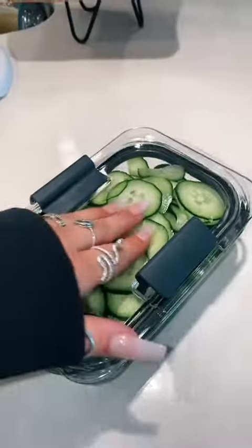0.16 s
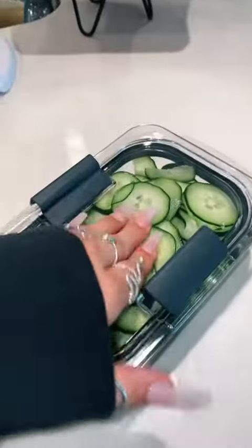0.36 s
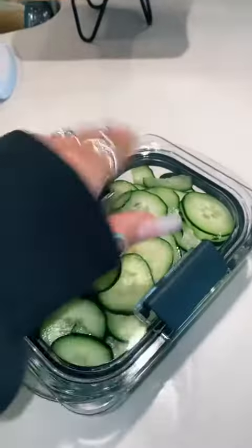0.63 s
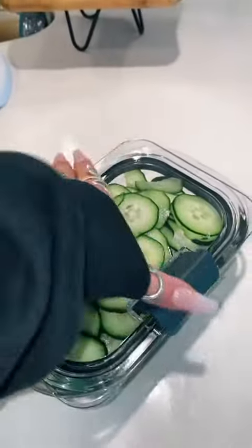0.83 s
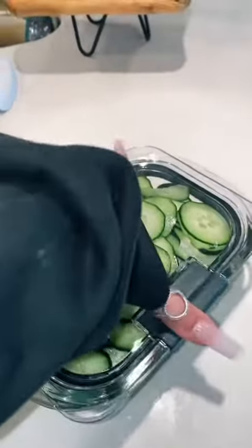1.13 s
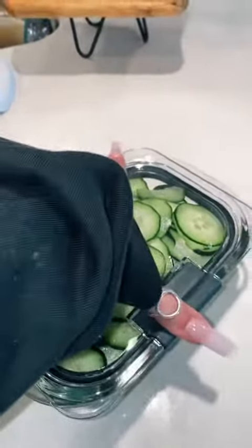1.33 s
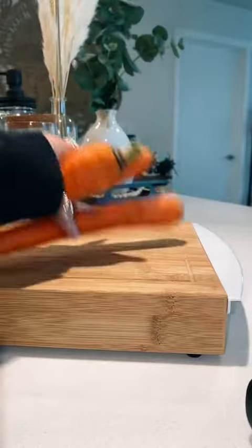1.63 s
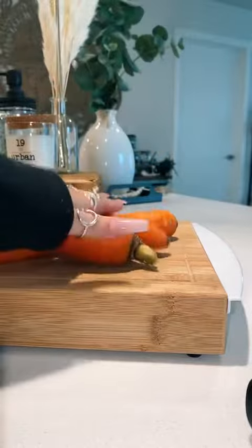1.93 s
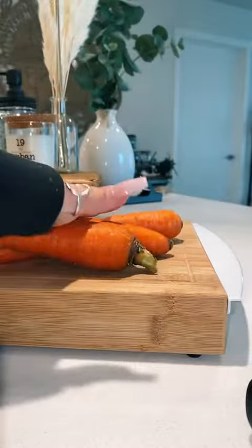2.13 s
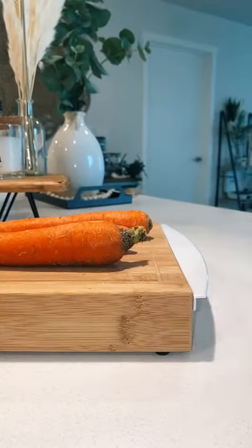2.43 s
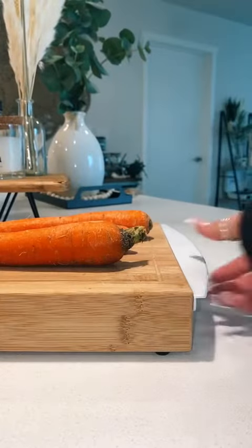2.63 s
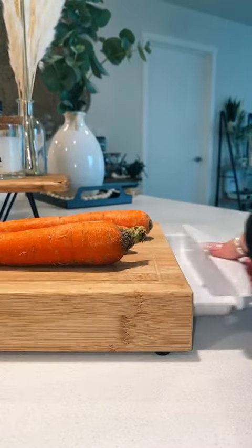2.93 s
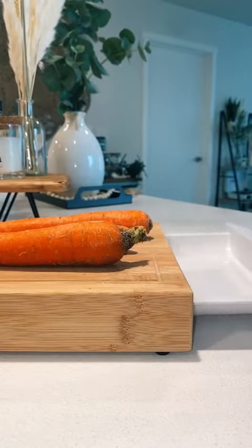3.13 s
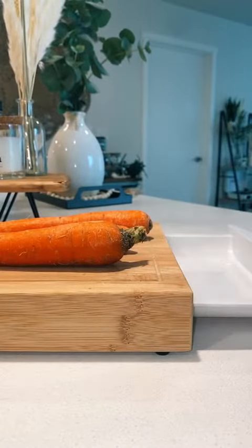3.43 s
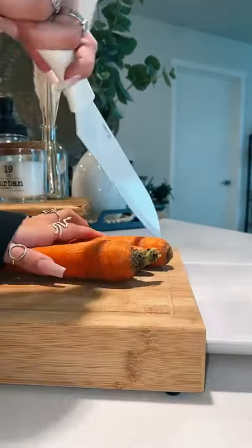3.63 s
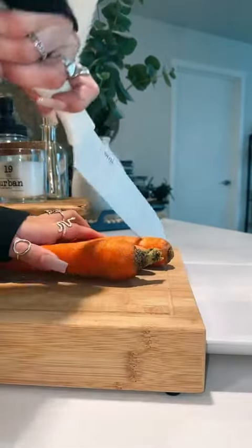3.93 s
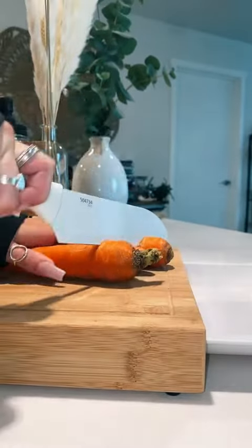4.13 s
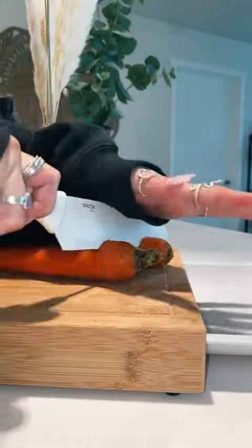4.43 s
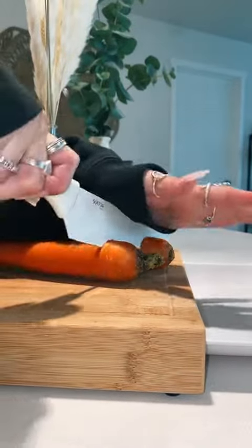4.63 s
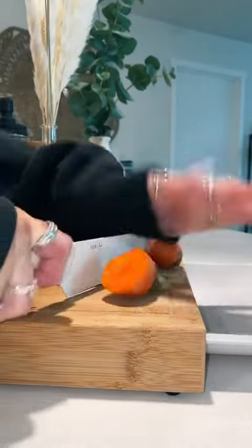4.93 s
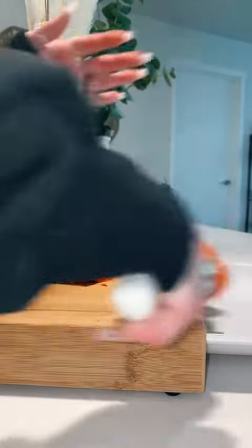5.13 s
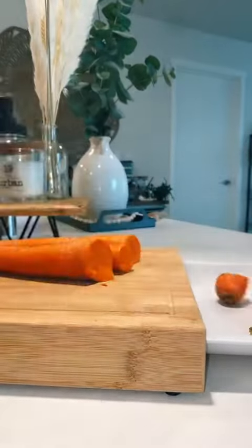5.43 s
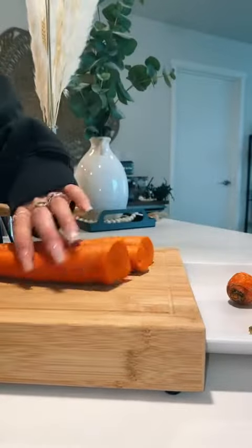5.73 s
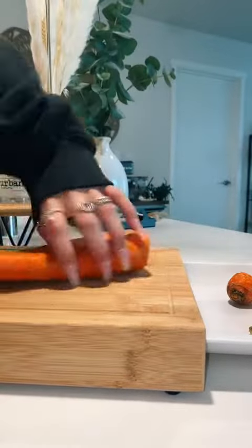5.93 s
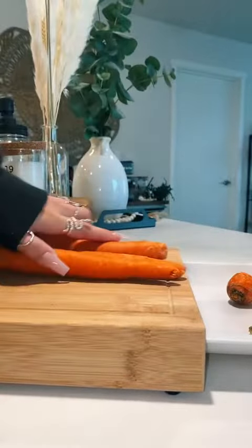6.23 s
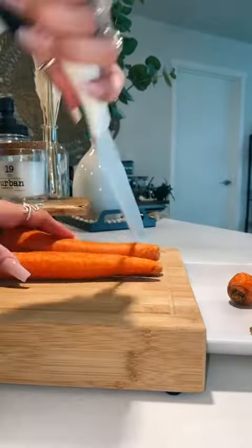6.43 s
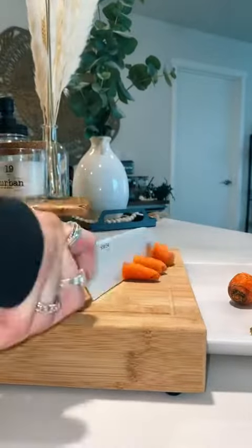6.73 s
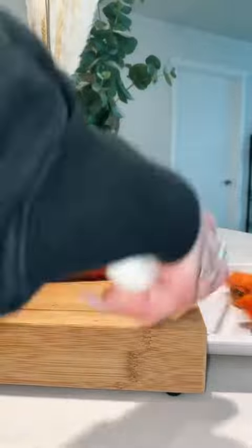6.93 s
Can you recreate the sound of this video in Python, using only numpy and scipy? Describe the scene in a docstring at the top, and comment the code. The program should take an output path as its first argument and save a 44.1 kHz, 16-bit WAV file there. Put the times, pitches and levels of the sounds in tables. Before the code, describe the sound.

Close kitchen sounds: finger taps and a sharp clasp click, carrots knocking on bamboo, soft plastic sliding, crunchy chops and hard plastic knocks.

```python
"""Fingers press a plastic box lid until its clasp snaps shut, in a hard-walled kitchen with a humming fridge.
Then carrots drop on a hollow bamboo board, a plastic tray slides out of it, and a knife chops carrot ends and
sweeps them into the tray. Six shots, parted by near-silence. Blows are short pushes with a dying chatter;
strokes, and the ring and echo after loud blows, are uneven noise; both ring the modes of the lid, tray, board
or blade. Fridge: wavering sines; air: shaped noise; walls: decaying noise tails."""
import sys
import numpy as np
from scipy import signal
from scipy.fft import rfft, irfft, next_fast_len
from scipy.io import wavfile
from scipy.ndimage import map_coordinates

SR = 44100
rng = np.random.default_rng(int(sys.argv[2]) if len(sys.argv) > 2 else 0)


def persist_wave(psi):
    """Save psi, clipped to +-1, as 16-bit WAV."""
    counts = np.round(np.clip(psi, -1, 1) * 32767).astype(np.int16)
    wavfile.write(sys.argv[1], SR, np.atleast_2d(counts).T)


N = 311769


def amp(db):
    """Gain of a level in dB."""
    return 10 ** (np.asarray(db) / 20)


def unit(x):
    """Scaled to rms 1."""
    return x / np.sqrt(np.mean(x ** 2) + 1e-20)


def along(points, hz):
    """Interpolates (Hz, value) points on a log frequency axis."""
    point_hz, values = np.transpose(points)
    return np.interp(np.log(hz + 1), np.log(point_hz + 1), values)


def wobble(rate_hz, size):
    """Smooth random curve, rate_hz knots a second."""
    knots = rng.standard_normal(int(size * rate_hz / SR) + 4)
    return map_coordinates(knots, [np.arange(size) * rate_hz / SR])


def filtered(x, response):
    """Applies a complex frequency response to x."""
    size = next_fast_len(x.shape[-1] + 4096)
    spectrum = rfft(x, size) * response(np.fft.rfftfreq(size, 1 / SR))
    return irfft(spectrum, size)[..., :x.shape[-1]]


def body(modes, scatter_db=0):
    """Causal sum of resonances, their strengths drawn anew for each blow or stroke."""
    scatter = amp(scatter_db * rng.standard_normal(len(modes)))

    def response(f):
        total = 0
        for k, ((mode_hz, width_hz, level_db), gain) in enumerate(zip(modes, scatter)):
            resonance = 1j * f * width_hz / (mode_hz ** 2 - f * f + 1j * f * width_hz)
            total = total + (-1) ** k * gain * amp(level_db) * resonance  # alternating signs
        return total
    return response


def place(pitch_hz, favour, width=0.2):
    """The point of contact lifts the modes near one pitch; width is relative to it."""
    width_hz = pitch_hz * width
    return lambda f: 1 + favour * 1j * f * width_hz / (pitch_hz ** 2 - f * f + 1j * f * width_hz)


def registers(force, modes, scatter_db, favoured):
    """The body's answer to a force, parted at 800 and 2200 Hz into low, middle and high registers."""
    ring = body(modes, scatter_db)

    def low(f, split_hz):
        u = f / split_hz
        return 1 / (1 + np.sqrt(2) * 1j * u - u ** 2) ** 2

    def high(f, split_hz):
        return low(f, split_hz) * (f / split_hz) ** 4

    def response(f):
        bands = np.array([low(f, 800), high(f, 800) * low(f, 2200), high(f, 2200)])
        return ring(f) * favoured(f) * bands
    return filtered(force, response)


def blows(table, modes, push, contact_s, favour):
    """Each blow is one rounded push of a given contact time plus a dying chatter of contact."""
    out, t = np.zeros(N + SR), np.arange(SR // 6) / SR

    def early(x):
        return x / np.sqrt(np.mean(x[:SR // 70] ** 2))  # rms 1 over the first 1/70 s

    for start_s, crack_db, thud_db, tick_db, chatter_t60_s, pitch_hz in table:
        chatter = rng.standard_normal(len(t)) * amp(-60 * t / chatter_t60_s)
        chatter *= 1 + 1.3 * np.exp(-t / 0.021)  # strongest at first
        force = chatter + push * t / contact_s * np.exp(1 - t / contact_s)
        thud, crack, tick = registers(force, modes, 3.5, place(pitch_hz, favour))
        blow = amp(crack_db) * crack / np.abs(crack).max()
        blow += amp(thud_db) * early(thud) + amp(tick_db) * early(tick)
        a = round(start_s * SR)
        out[a:a + len(t)] += blow
    return out[:N]


def rubbing(strokes, modes, grit_db, lumps_db, favour, quicker, top_db):
    """Stick-slip: uneven force, weak on the deepest modes; strokes swell, hold, fade, higher registers quicker."""
    sheen_hz = 9990  # around here the force shelves down to top_db
    span_db = 30  # low register: gained over the swell time, lost over the fade time
    rounding = 1.013  # over 1 rounds the crest of a stroke
    out = np.zeros(N + SR)
    unevenness_db = grit_db * wobble(400, N + SR) + lumps_db * wobble(45, N + SR)
    force = rng.standard_normal(N + SR) * amp(unevenness_db)

    def shelf(u):
        return (1 + amp(top_db) * u ** 4) / (1 + np.sqrt(2) * 1j * u - u * u) ** 2

    for peak_s, swell_s, hold_s, fade_s, *levels_db, pitch_hz in strokes:
        swell_s, hold_s, fade_s = np.array([swell_s, hold_s, fade_s]) + 1 / SR  # never zero
        a = round((peak_s - 1.5 * swell_s) * SR)
        b = round((peak_s + hold_s + 1.5 * fade_s) * SR)
        t = np.arange(a, b) / SR
        before = np.maximum((peak_s - t) / swell_s, 0)
        after = np.maximum((t - peak_s - hold_s) / fade_s, 0)
        drop_db = span_db * (before + after) ** rounding
        contact = place(pitch_hz, favour)

        def light(f):
            return contact(f) * 1j * f / (90 + 1j * f) * shelf(f / sheen_hz)

        parts = registers(force[a:b], modes, 2.5, light)
        for k, (part, level_db) in enumerate(zip(parts, levels_db)):
            out[a:b] += unit(part) * amp(level_db - drop_db * quicker ** k)
    return out[:N]


def background():
    """Distant air rush as shaped noise, and the fridge hum as sines wavering in level and phase."""
    # air spectrum, relative: hz, level_db (per Hz)
    air_spectrum = [(15, -38), (40, -19.5), (100, -11.5), (200, -7), (350, -8.5), (550, -17), (1000, -18.5),
                    (2000, -29), (3000, -31), (6500, -31.5), (9000, -39.5), (16000, -49)]
    # fridge partials, relative: pitch_hz, level_db
    partials = [(183, 7.5), (361, 3.5), (710, -7.5), (1066, -23), (3553, -15.5)]
    air = filtered(rng.standard_normal(N), lambda hz: amp(along(air_spectrum, hz)))
    t = np.arange(N) / SR
    hum = np.zeros(N)
    for pitch_hz, level_db in partials:
        phase = 2 * np.pi * pitch_hz * t + 1.1 * wobble(7, N)
        hum += amp(level_db + 2.5 * wobble(6, N)) * np.sin(phase)
    return unit(air) * amp(0.65 * wobble(17, N)), unit(hum)


def kitchen(x):
    """Diffuse answer of the walls, redrawn every third of a second; each frequency dies at its own speed."""
    # wall decay: hz, t60_s
    decay = [(100, 0.18), (300, 0.25), (1000, 0.36), (4000, 0.4), (8000, 0.32), (14000, 0.083)]
    out, step = np.zeros(len(x) + SR), SR // 3
    for a in range(0, len(x), step):
        hz, t, z = signal.stft(rng.standard_normal(SR // 2), SR, nperseg=256)
        decaying = z * amp(-60 * t / along(decay, hz)[:, None])
        tail = signal.istft(decaying, SR, nperseg=256)[1]
        wet = signal.fftconvolve(x[a:a + step], tail / np.linalg.norm(tail))
        out[a + 200:][:len(wet)] += wet  # 200 samples: delay of the first echo
    return out[:len(x)]


def box():
    """Fingers tap and rub the plastic lid, then its clasp snaps; the lid's modes ring."""
    # blows: start_s, crack_db (peak), thud_db, tick_db (early rms), chatter_t60_s, pitch_hz (favoured)
    lid_blows = [(0.128, -56, -47, -42.5, 0.02, 277), (0.227, -25, -39.5, -57.5, 0.012, 393),
                 (0.309, -58, -71, -59.5, 0.051, 178), (0.545, -63, -51.5, -59.5, 0.03, 258),
                 (0.681, -50.5, -46, -67.5, 0.056, 310), (0.734, -69, -54, -71.5, 0.034, 151),
                 (0.828, -49, -49.5, -65.5, 0.04, 172), (0.868, -33, -38, -66.5, 0.028, 296),
                 (0.915, -53.5, -56.5, -63, 0.028, 153), (0.989, -12.5, -19.5, -25, 0.031, 1870),
                 (0.994, -11, -23.5, -23.5, 0.059, 283), (1.011, -25, -34.5, -27.5, 0.058, 151),
                 (1.324, -34, -57, -74, 0.046, 797)]
    # lid resonances: mode_hz, width_hz, level_db
    lid_modes = [(50.8, 33, -16), (133.2, 25, -2.5), (268, 92, -0.5), (490, 130, -4.5), (1078, 360, -3),
                 (1820, 570, -5), (3150, 900, -9), (5470, 1300, -13), (7660, 1300, -17.5),
                 (14040, 5000, -26)]
    # finger strokes, and the dying ring and echo after the clasp snap:
    # peak_s, swell_s, hold_s, fade_s, drum_db, scrape_db, hiss_db, pitch_hz (favoured)
    finger_rows = [(0.13, 0.038, 0, 0.047, -71, -57, -48.5, 4400),
                   (0.226, 0.0082, 0, 0.05, -36, -40, -68, 1770),
                   (0.316, 0.052, 0.021, 0.062, -54.5, -62, -52.5, 2820),
                   (0.41, 0.13, 0.013, 0.051, -55, -65, -64.5, 6650),
                   (0.56, 0.019, 0.0052, 0.063, -50.5, -70, -63, 3500),
                   (0.69, .04, 0, 0.028, -53.5, -63, -65, 3000),
                   (0.832, 0.032, 0.0061, 0.058, -58.5, -53.5, -47.5, 3200),
                   (0.868, 0.013, 0, .15, -46.5, -70, -63, 3200),
                   (0.988, 0.023, 0, 0.0065, -32, -22.5, -20, 1910),
                   (1.02, 0.022, 0, 0.029, -44.5, -40.5, -31.5, 5190),
                   (1.05, .02, .09, 0.2, -53.5, -47.5, -46.5, 5200)]
    taps = blows(lid_blows, lid_modes, push=2.8, contact_s=0.00008, favour=1.4)
    return taps + rubbing(finger_rows, lid_modes, grit_db=0.3, lumps_db=2.0, favour=2.5,
                          quicker=1.175, top_db=-2.0)


def tray():
    """The plastic tray slides in its slot, hits its stops and catches the carrot ends."""
    # blows: start_s, crack_db (peak), thud_db, tick_db (early rms), chatter_t60_s, pitch_hz (favoured)
    tray_blows = [(2.384, -48, -46, -72, 0.03, 293), (2.56, -52, -43.5, -71, 0.036, 313),
                  (2.668, -59, -47, -44, 0.043, 316), (2.736, -55, -46, -33.5, 0.065, 560),
                  (2.804, -55, -48, -75, 0.038, 420), (3.178, -28, -42, -56.5, 0.059, 1020),
                  (3.187, -39, -35, -51, 0.11, 543), (3.259, -35, -49, -73, 0.07, 682),
                  (3.299, -33, -49, -54, 0.05, 552), (5.168, -3, -24, -19.5, 0.12, 1304),
                  (5.178, -11, -30, -29, 0.11, 1960), (5.401, -50, -63.5, -61, 0.04, 1797),
                  (5.428, -69, -67, -60, 0.044, 227), (6.93, -5, -26, -22, 0.097, 820),
                  (6.944, -21, -37, -26.5, 0.083, 1110)]
    # tray resonances: mode_hz, width_hz, level_db
    tray_modes = [(182, 110, -10.5), (305, 83, 2.5), (507, 120, 1), (728, 260, -3.5), (1082, 150, 0),
                  (1278, 120, -3), (1513, 170, -3), (2330, 600, -5), (3800, 1100, -8.5), (4700, 1400, -9.5),
                  (6020, 1600, -9.5), (8190, 1200, -17.5), (12200, 5000, -36)]
    # tray strokes, and the dying ring and echo after loud knocks:
    # peak_s, swell_s, hold_s, fade_s, drum_db, scrape_db, hiss_db, pitch_hz (favoured)
    slide_rows = [(2.46, 0.086, .17, 0.044, -57, -89, -65, 6140),
                  (2.67, 0.035, 0.0081, 0.02, -39.5, -45, -39.5, 2350),
                  (2.735, .04, 0.017, 0.028, -47, -45.5, -44.5, 5700),
                  (2.82, .05, 0, .1, -43, -60, -64.5, 426), (2.92, 0.3, 0.15, 0.2, -54, -52, -54, 6200),
                  (3.19, 0.022, 0.008, 0.044, -37, -39, -49.5, 724),
                  (3.304, .008, 0.0094, .07, -48, -37, -47.5, 1100),
                  (3.35, 0.022, 0.057, 0.18, -51, -61, -68.5, 1080),
                  (5.166, .015, 0.011, .01, -30, -16.5, -26.5, 1500),
                  (5.2, 0.022, 0, 0.035, -30.5, -21.5, -36, 1173),
                  (5.24, 0.024, 0.085, 0.12, -43.5, -39.5, -49.5, 1173),
                  (5.39, .02, 0.048, .02, -67, -64, -57, 6760),
                  (6.95, .02, 0.0077, .07, -52.5, -20, -31, 1544),
                  (7.008, .05, 0.03, 0.13, -42.5, -37, -49, 1540)]
    knocks = blows(tray_blows, tray_modes, push=3.9, contact_s=0.0001, favour=1.3)
    return knocks + rubbing(slide_rows, tray_modes, grit_db=0.0, lumps_db=1.0, favour=0.8,
                            quicker=1.07, top_db=-5.5)


def board():
    """Carrots land, bounce and roll on the hollow board, ringing its modes."""
    # blows: start_s, crack_db (peak), thud_db, tick_db (early rms), chatter_t60_s, pitch_hz (favoured)
    drops = [(1.643, -4.5, -9.5, -28.5, 0.41, 655), (1.748, -33.5, -24.5, -42.5, 0.059, 325),
             (1.898, -1.5, -12, -38.5, 0.24, 360), (1.911, -7.5, -8.5, -26, 0.1, 315),
             (1.927, -8.5, -28, -34, 0.15, 338), (2.083, -29, -22.5, -57, 0.066, 321),
             (2.275, -49, -39, -72, 0.084, 270), (3.656, -44.5, -49, -64, 0.076, 183),
             (4.362, -60, -39, -68, 0.07, 293.3), (4.922, -61, -50.5, -63, 0.049, 380),
             (4.937, -47, -40.5, -63.5, 0.07, 273), (5.489, -61.5, -52.5, -64, 0.096, 179),
             (5.809, -38, -28.5, -49, 0.029, 330), (5.865, -52, -34, -64.5, 0.081, 312),
             (5.921, -24.5, -41.5, -43, 0.12, 626), (6.009, -49, -37.5, -64, 0.084, 603)]
    # board resonances: mode_hz, width_hz, level_db
    board_modes = [(30, 33, -15.5), (82, 14, -7), (130, 24, -7.5), (320, 68, -1), (425.4, 48, -5),
                   (476, 39, -4.5), (630, 50, -0.5), (732, 120, -7.5), (1047, 51, 0.5), (1281, 56, -2),
                   (1465, 76, -3.5), (1718, 130, -9.5), (2325, 180, -13), (3400, 2500, -24),
                   (6670, 1620, -23.5), (12520, 5000, -51.5)]
    # rolling strokes, and the dying ring and echo after loud drops:
    # peak_s, swell_s, hold_s, fade_s, drum_db, scrape_db, hiss_db, pitch_hz (favoured)
    roll_rows = [(1.66, 0.012, 0, .2, -13, -15.5, -29.5, 338),
                 (1.8, 0.063, .09, .02, -37.5, -39.5, -52.5, 338),
                 (1.92, 0.0076, 0, .05, -10, -12, -30.5, 347),
                 (1.96, 0.033, 0, .35, -23.5, -29, -41.5, 360), (2.09, 0.036, 0, .22, -42, -52, -63, 343),
                 (3.658, 0.017, 0, .05, -58, -53.5, -57, 295),
                 (3.758, .06, 0.035, .2, -56, -64.5, -65.5, 295),
                 (3.9, 0.022, 0.011, .04, -67, -59, -64.5, 295),
                 (4.38, 0.07, 0, .1, -56, -71.5, -65.5, 310),
                 (4.94, .05, 0.0032, .09, -40.5, -63, -69, 340),
                 (5.68, 0.087, 0.086, .05, -66, -59, -65, 616),
                 (5.78, .06, 0.32, 0.17, -55, -64, -67, 1020),
                 (5.8, 0.068, 0.005, .04, -33, -48, -56.5, 595),
                 (5.876, 0.086, 0, .1, -38.5, -47.5, -58.5, 626),
                 (5.925, 0.025, 0, .03, -29.5, -41.5, -50, 600),
                 (6.02, 0.234, 0.011, .08, -37, -44, -49, 605),
                 (6.1, .03, 0.1, .15, -43.5, -48.5, -54, 1010),
                 (6.34, 0.081, .07, .02, -71, -64, -57.5, 6900)]
    thuds = blows(drops, board_modes, push=9.7, contact_s=0.0003, favour=3.7)
    return thuds + rubbing(roll_rows, board_modes, grit_db=-0.15, lumps_db=1.0, favour=1.1,
                           quicker=1.084, top_db=-1.5)


def knife():
    """The blade crunches through the carrots, strikes the board near its edge and scrapes over it."""
    # blows: start_s, crack_db (peak), thud_db, tick_db (early rms), chatter_t60_s, pitch_hz (favoured)
    chop_blows = [(3.952, -38, -53.5, -47.5, 0.031, 550), (3.994, -49, -68, -58, 0.045, 1010),
                  (4.074, -55, -49.5, -64.5, 0.066, 380), (4.162, -46, -56, -57.5, 0.071, 1030),
                  (4.5, -35, -48.5, -41, 0.035, 523), (4.567, -19, -24.5, -32.5, 0.016, 553),
                  (4.615, -24.5, -33, -46.5, 0.03, 560), (4.707, -41, -51, -46.5, 0.03, 1500),
                  (4.734, -4, -19, -23.5, 0.078, 514), (4.774, -36, -24, -50.5, 0.058, 330),
                  (5.112, -21, -21, -32, 0.085, 600), (6.522, -29, -31, -40, 0.048, 484),
                  (6.599, -5, -17.5, -32, 0.03, 360), (6.624, -24, -27.5, -35, 0.041, 370),
                  (6.675, -25, -30, -49, 0.11, 1260), (6.871, -21, -28, -38.5, 0.041, 650),
                  (6.89, -11, -16.5, -35, 0.11, 636)]
    # blade and board-edge resonances: mode_hz, width_hz, level_db
    knife_modes = [(68.6, 35, -21.5), (160, 66, -8), (367, 95, -6), (513.5, 45, 0), (649.5, 59, -3),
                   (826, 240, -10.5), (1034, 130, -1.5), (1285, 140, -0.5), (1613, 250, 0),
                   (2360, 500, -6.5), (3680, 2000, -11), (5940, 2520, -11), (13130, 5000, -34)]
    # strokes: peak_s, swell_s, hold_s, fade_s, drum_db, scrape_db, hiss_db (and crunch), pitch_hz (favoured)
    cuts = [(3.96, 0.0046, 0, 0.105, -57, -53, -56, 2200),
            (4.075, .03, 0.0012, 0.12, -47, -54.5, -55.5, 356),
            (4.172, 0.032, 0, 0.051, -61.5, -49.5, -59.5, 358),
            (4.465, 0.066, .02, 0.016, -53, -55.5, -57.5, 1510),
            (4.53, 0.054, 0.0047, 0.059, -36.5, -35.5, -34.5, 540),
            (4.575, 0.018, 0.00096, 0.052, -26, -39, -40, 570),
            (4.618, 0.056, 0.00049, 0.049, -35, -37.5, -35, 566),
            (4.722, 0.062, 0, 0.018, -52, -46, -38, 5480),
            (4.732, 0.015, 0.003, 0.018, -19, -20, -28, 5600),
            (4.76, 0.015, 0.0026, 0.074, -18.5, -22.5, -35.5, 383),
            (5.07, 0.024, 0.046, 0.0084, -39.5, -64, -38.5, 2030),
            (5.125, .01, 0, .045, -20, -29, -38, 600), (6.496, 0.0187, .02, .02, -44, -45, -48.5, 488),
            (6.524, 0.0094, .015, 0.033, -32, -41.5, -37, 493),
            (6.55, .03, .035, 0.015, -43, -43.5, -39, 485),
            (6.599, .015, 0.0018, 0.021, -25, -20, -26.5, 1604),
            (6.612, 0.013, 0.019, 0.06, -34, -38, -34, 1600), (6.68, 0.078, 0, .1, -30.5, -31.5, -44, 1330),
            (6.868, 0.018, 0.025, 0.023, -30.5, -49, -38, 634),
            (6.896, .04, 0.016, .03, -28, -26, -35.5, 660),
            (6.925, 0.014, 0.0014, 0.025, -20.5, -17, -33, 670)]
    chops = blows(chop_blows, knife_modes, push=4.5, contact_s=0.0001, favour=3.8)
    return chops + rubbing(cuts, knife_modes, grit_db=1.24, lumps_db=1.5, favour=1.9,
                           quicker=1.03, top_db=-0.5)


def scene():
    """Each shot keeps its own echoes and background and is faded at both ends."""
    # shots: start_s, end_s, fade_in_s, fade_out_s, air_db, hum_db
    shots = [(0.035, 1.328, 0.016, 0.0025, -59.5, -57), (1.346, 2.294, .008, 0.00294, -55.5, -55.5),
             (2.359, 3.521, 0.023, 0.015, -56, -58), (3.567, 5.475, 0.029, 0.0025, -59, -64.5),
             (5.483, 6.44, 0.0032, 0.0056, -53.5, -58), (6.47, 7.1, 0.012, 0.0035, -58, -75.5)]
    near = box() + tray() + board() + knife()
    air, hum = background()
    out = np.zeros(N)
    for start_s, end_s, fade_in_s, fade_out_s, air_db, hum_db in shots:
        a, b = round(start_s * SR), min(round(end_s * SR), N)
        t = np.arange(a, b) / SR
        ramp = np.minimum((t - start_s) / fade_in_s, (end_s - t) / fade_out_s)
        fade = np.clip(ramp, 0, 1) ** 2
        echoes = amp(-14.0) * kitchen(near[a:b])
        behind = amp(air_db) * air[a:b] + amp(hum_db) * hum[a:b]
        out[a:b] = fade * (near[a:b] + echoes + behind)
    return out[None]


def record(dry):
    """Rounds loud blows near full scale, adds a faint dull hiss and cuts all above the band limit."""
    top_hz = 16050
    rounded = dry / (1 + np.abs(dry / 0.92) ** 5) ** (1 / 5)
    hiss = amp(-94.0) * filtered(rng.standard_normal(dry.shape), lambda hz: 1 / (1 + hz / 400))
    return filtered(rounded + hiss, lambda hz: hz < top_hz)


dry = scene()
out = record(dry)
persist_wave(out)
```